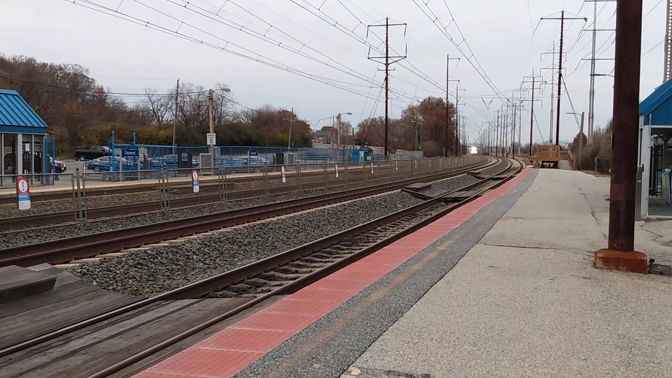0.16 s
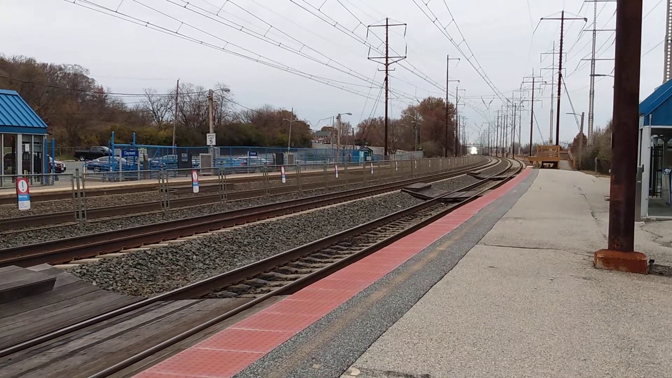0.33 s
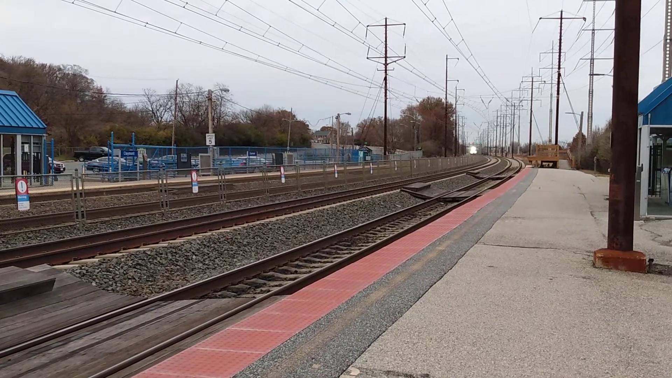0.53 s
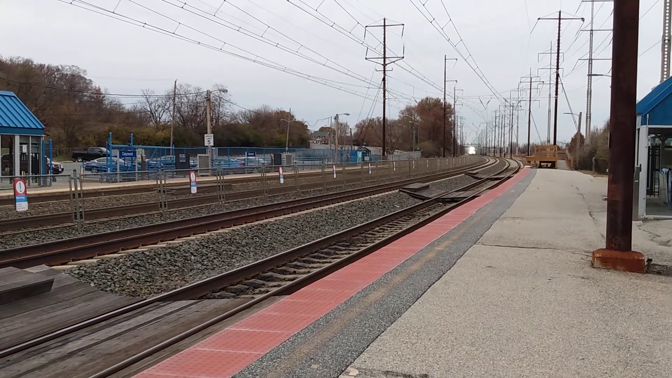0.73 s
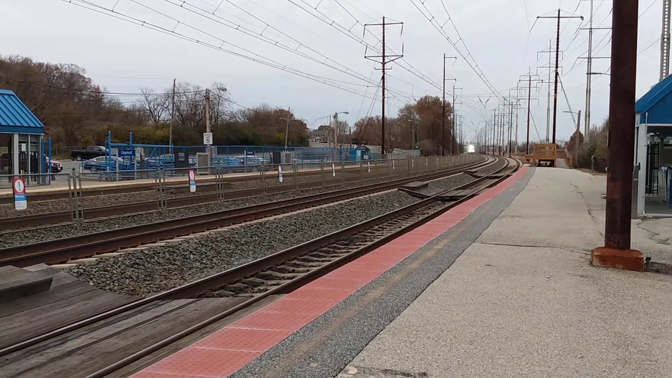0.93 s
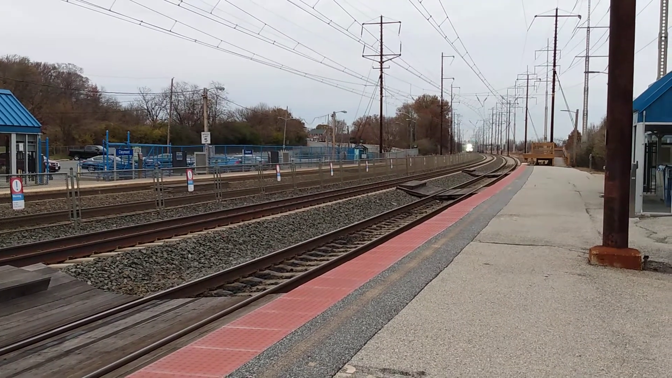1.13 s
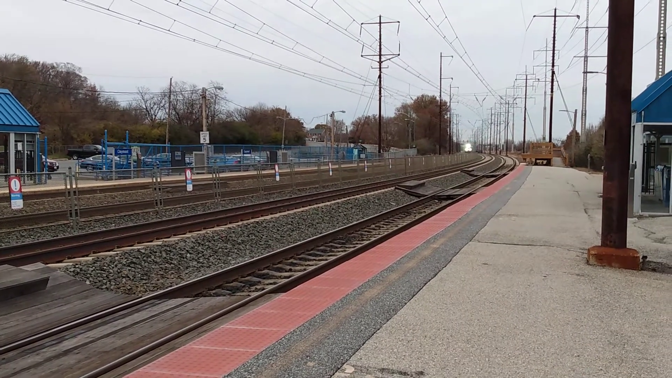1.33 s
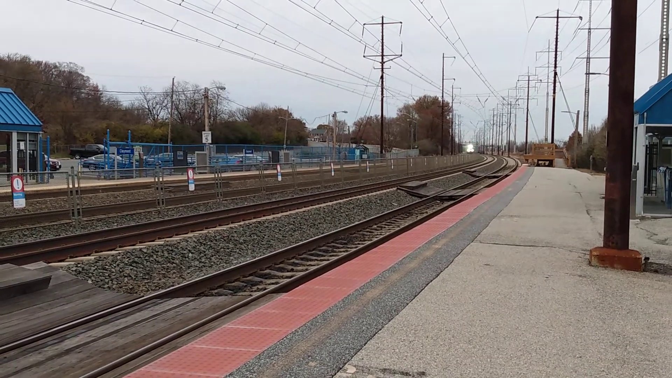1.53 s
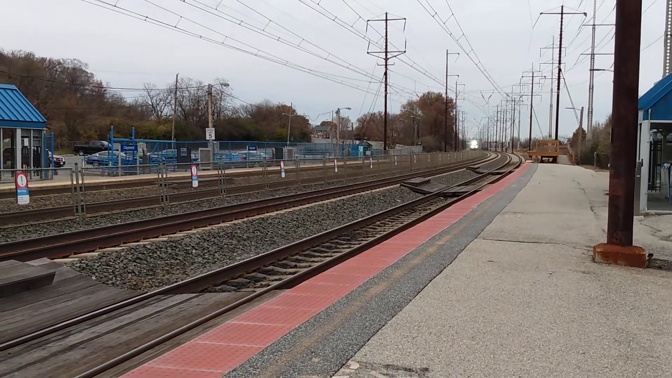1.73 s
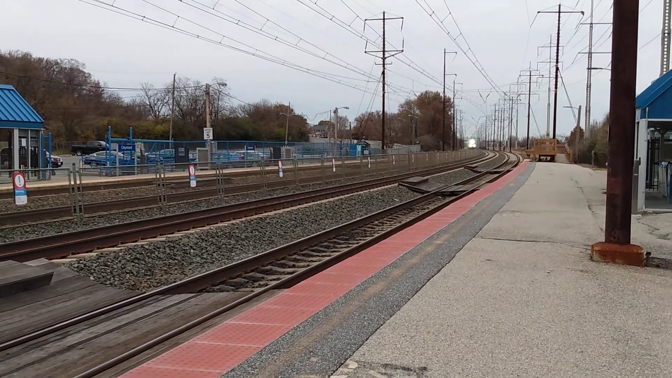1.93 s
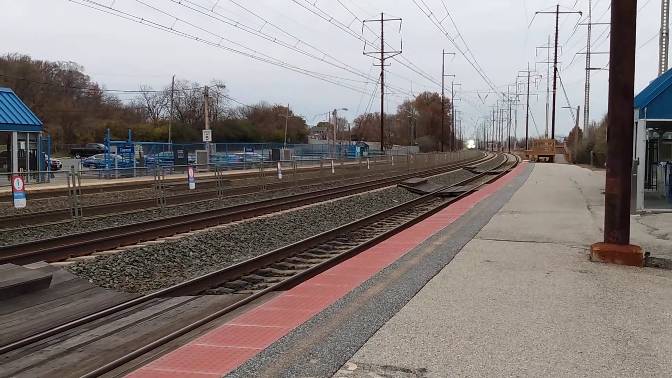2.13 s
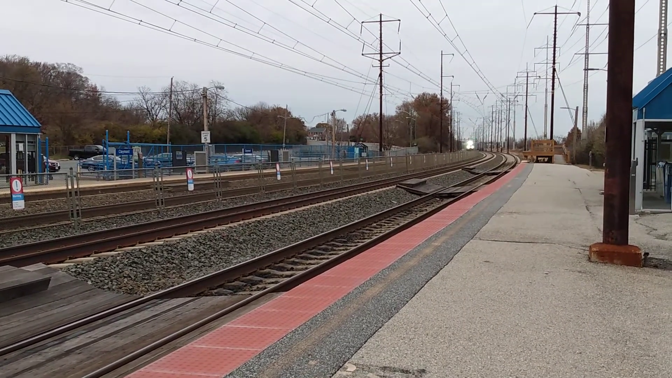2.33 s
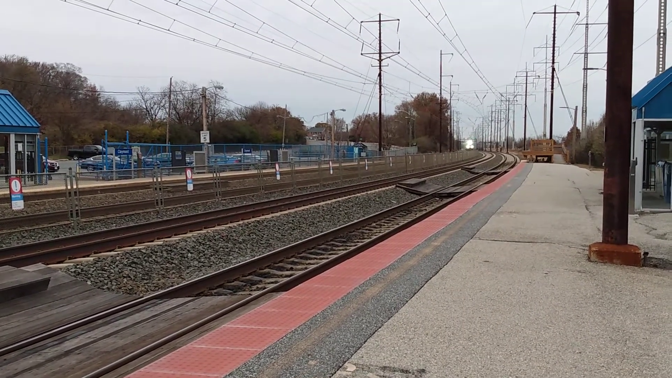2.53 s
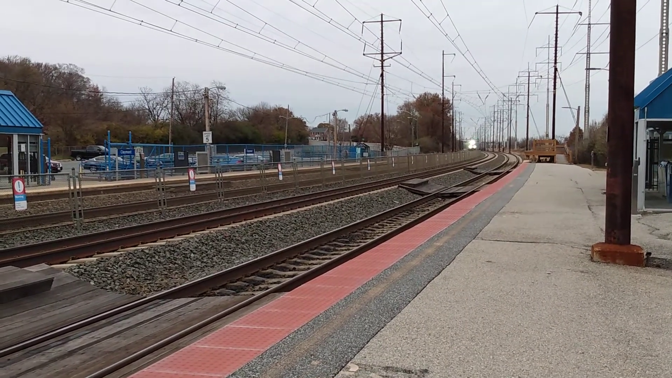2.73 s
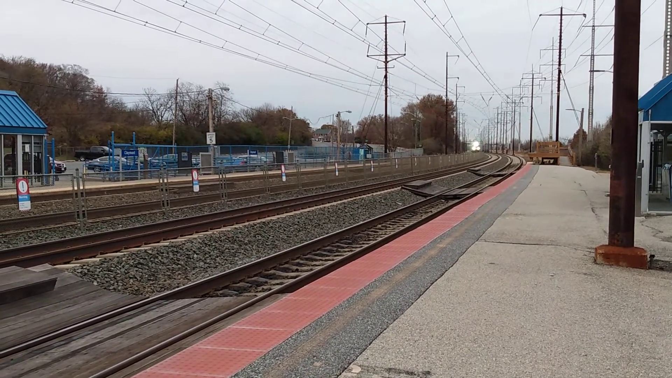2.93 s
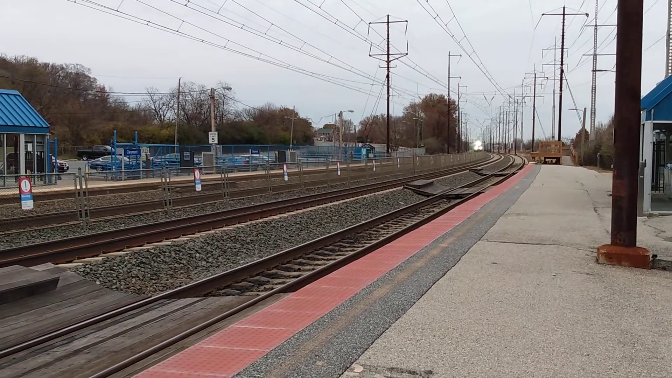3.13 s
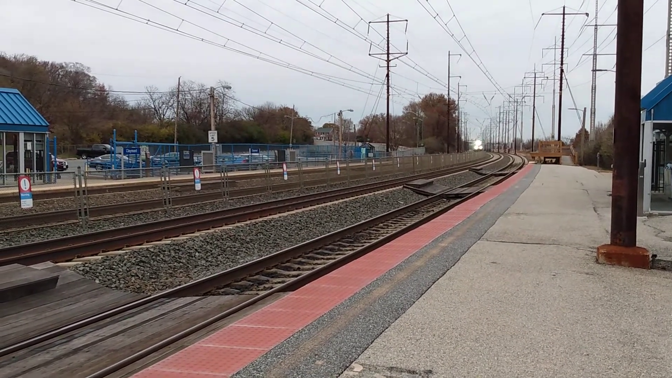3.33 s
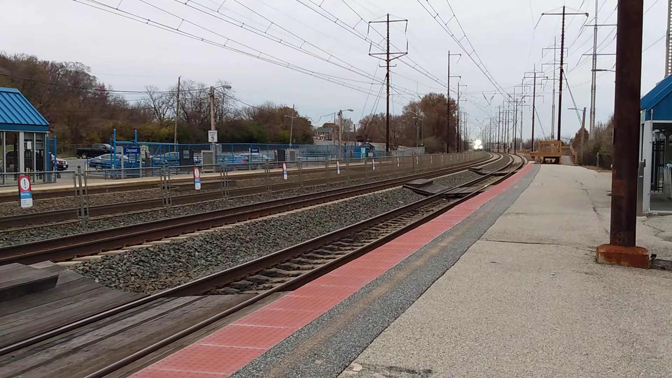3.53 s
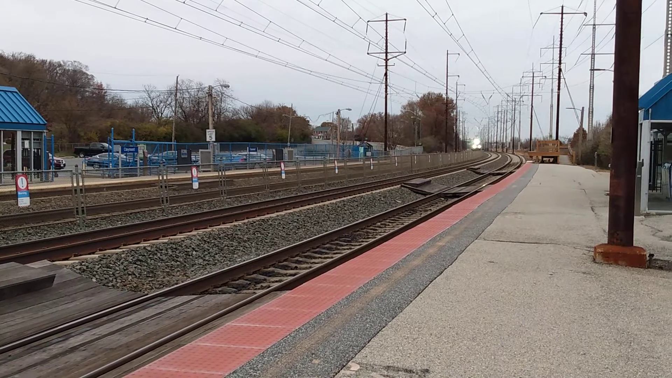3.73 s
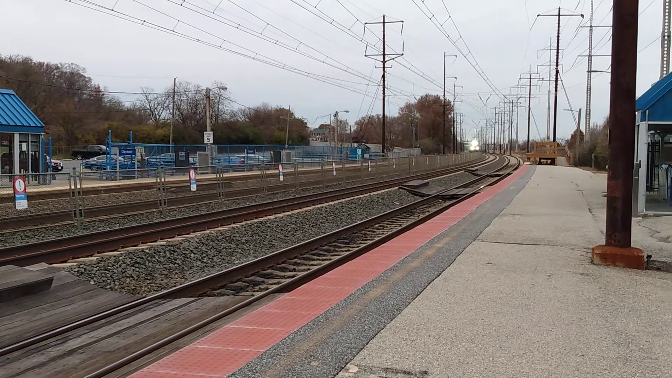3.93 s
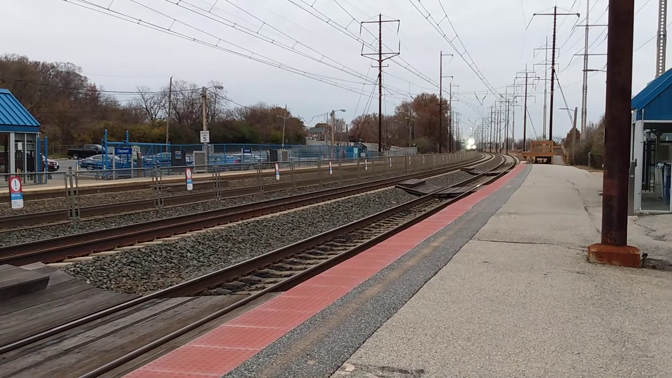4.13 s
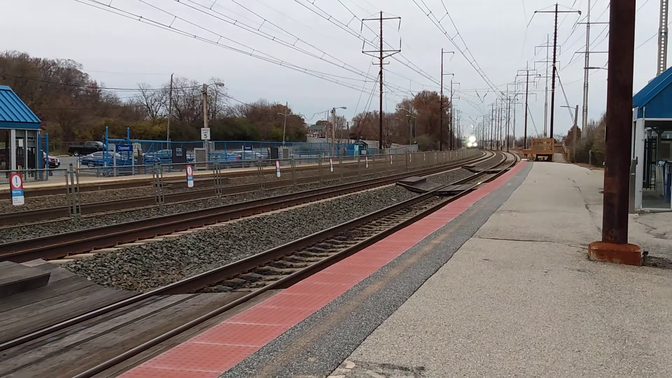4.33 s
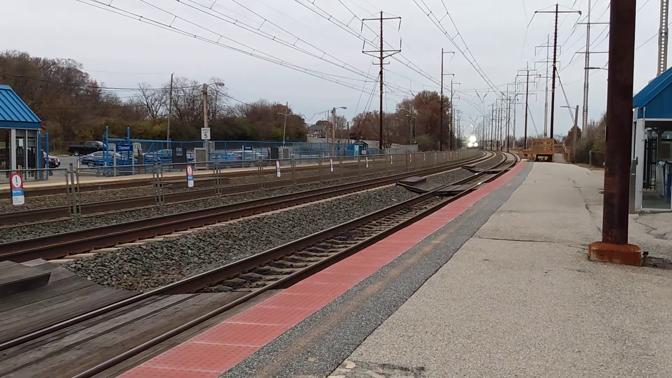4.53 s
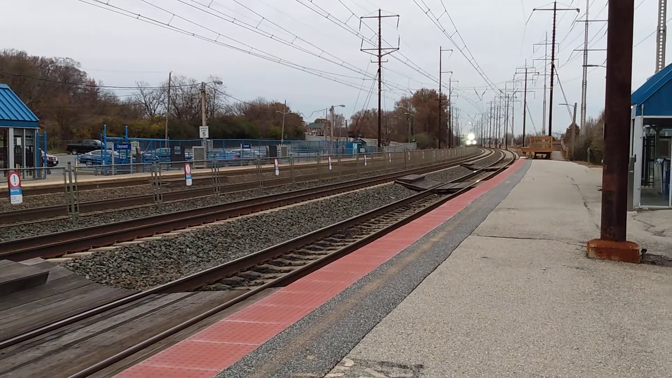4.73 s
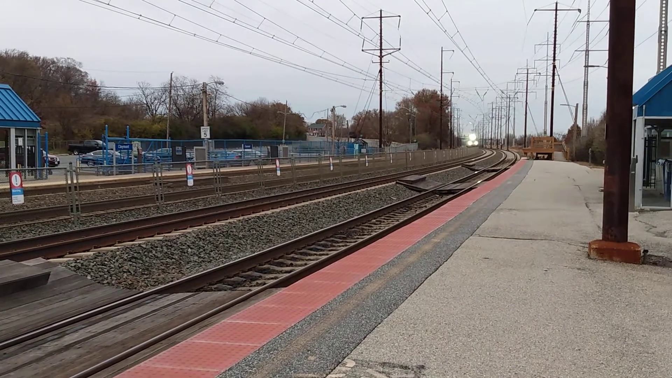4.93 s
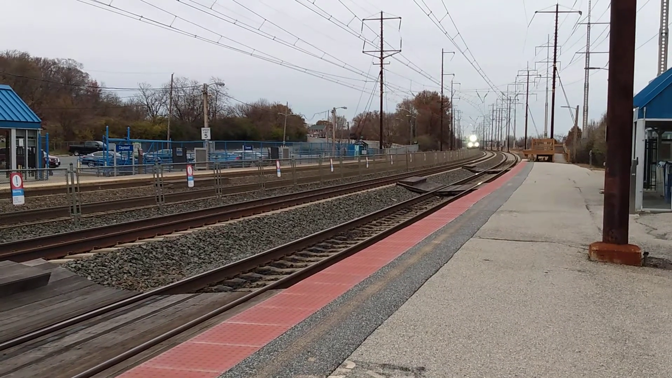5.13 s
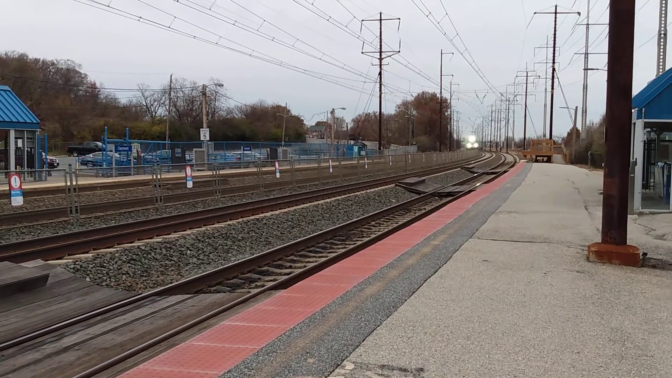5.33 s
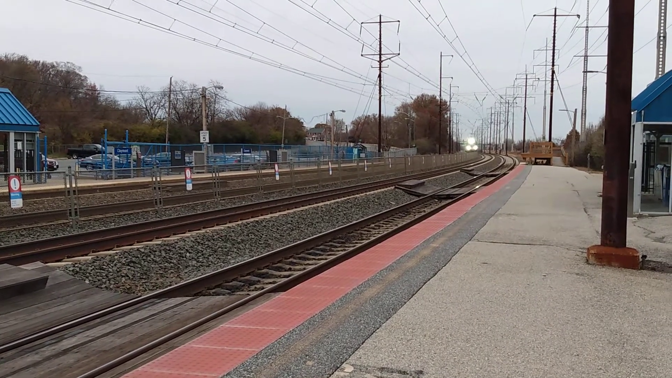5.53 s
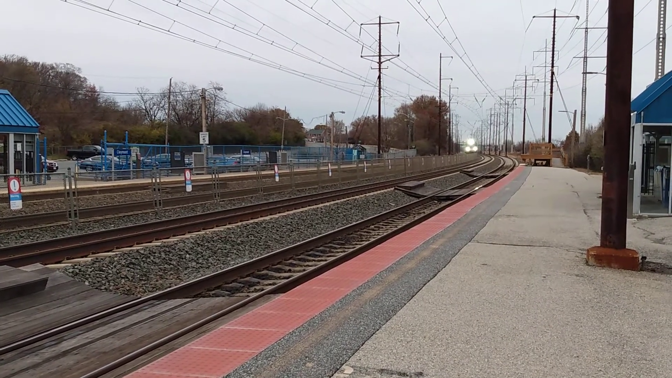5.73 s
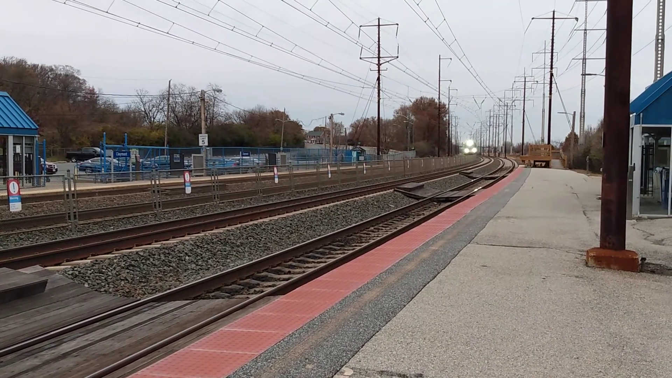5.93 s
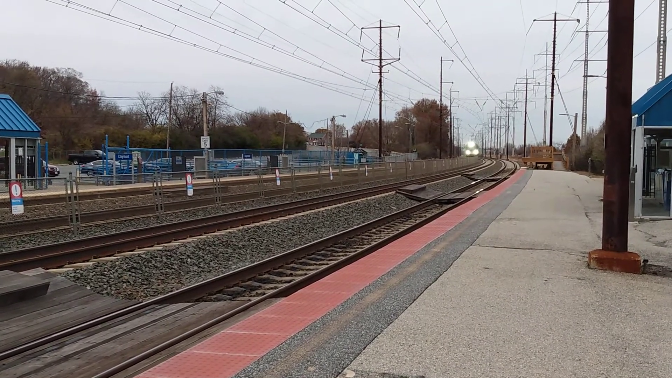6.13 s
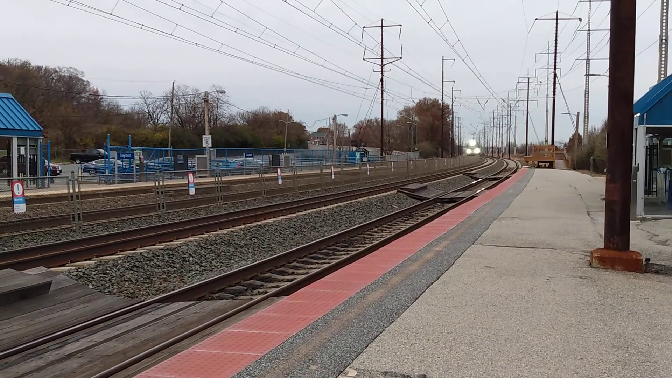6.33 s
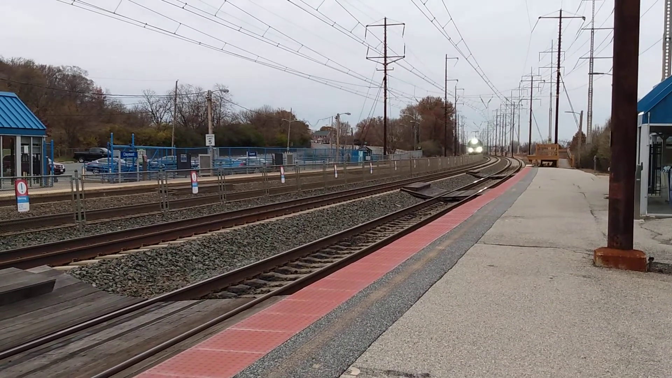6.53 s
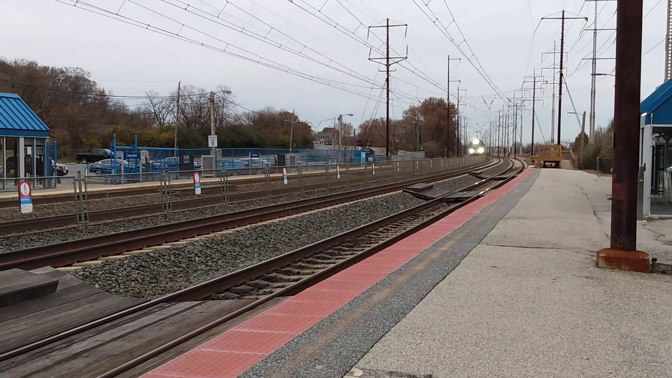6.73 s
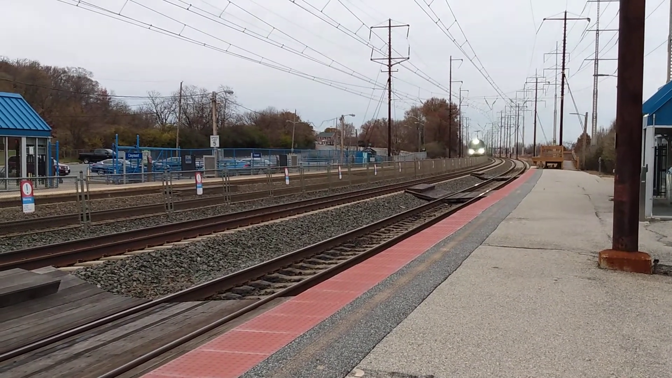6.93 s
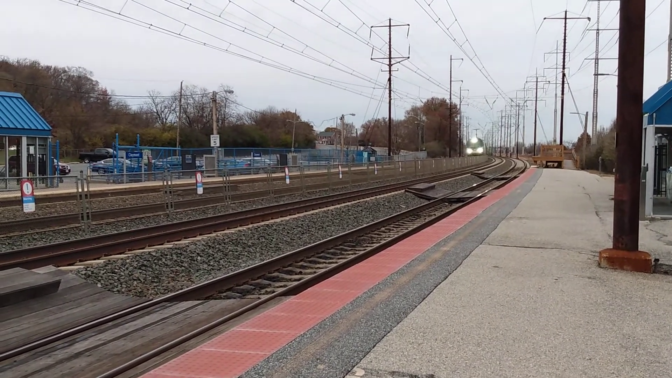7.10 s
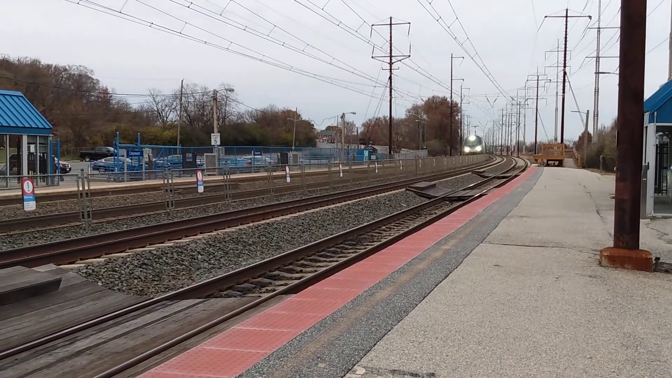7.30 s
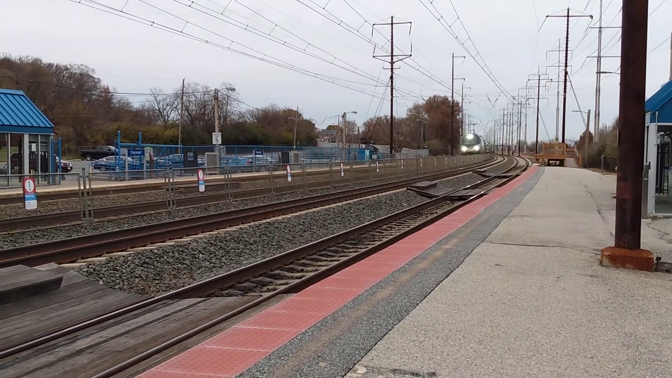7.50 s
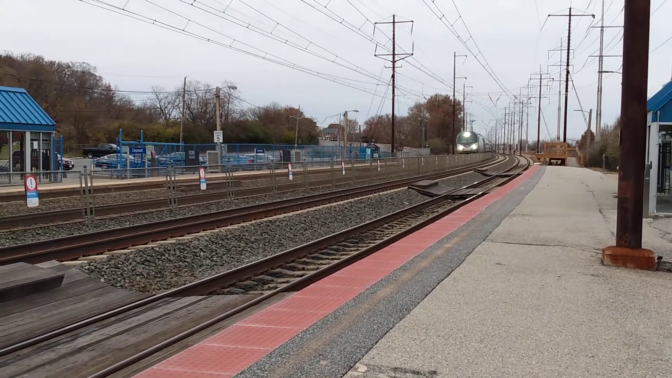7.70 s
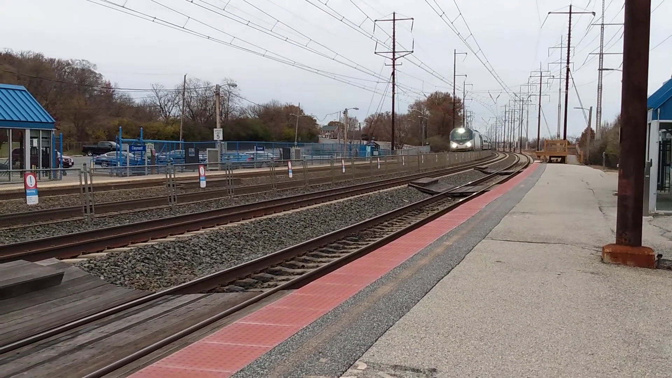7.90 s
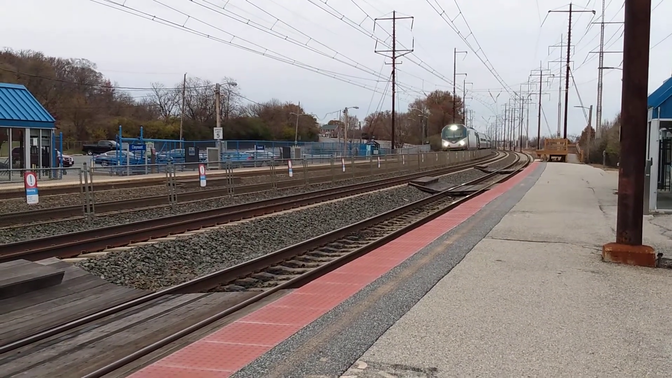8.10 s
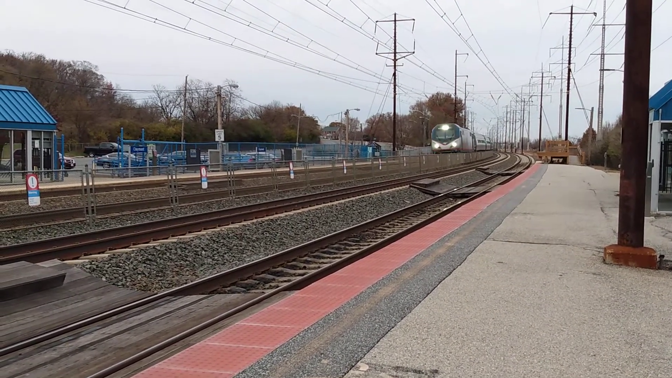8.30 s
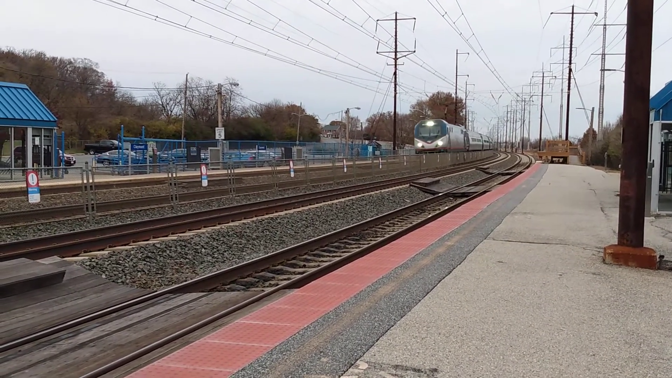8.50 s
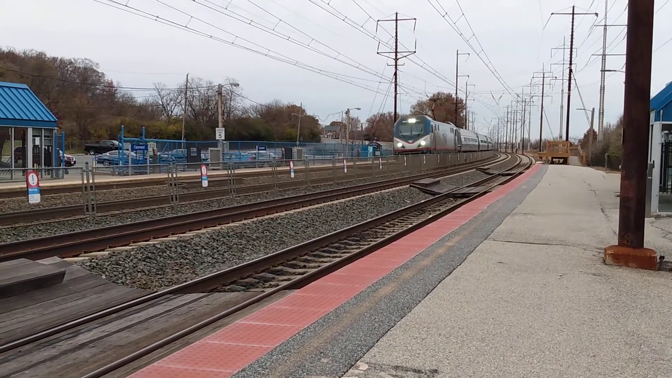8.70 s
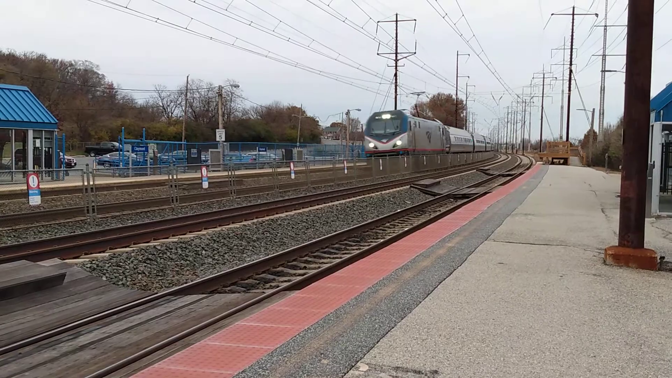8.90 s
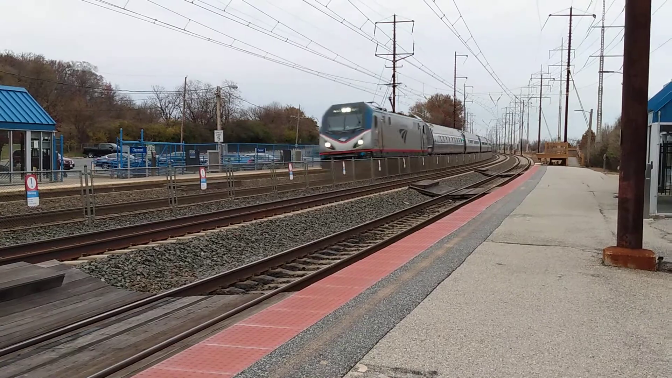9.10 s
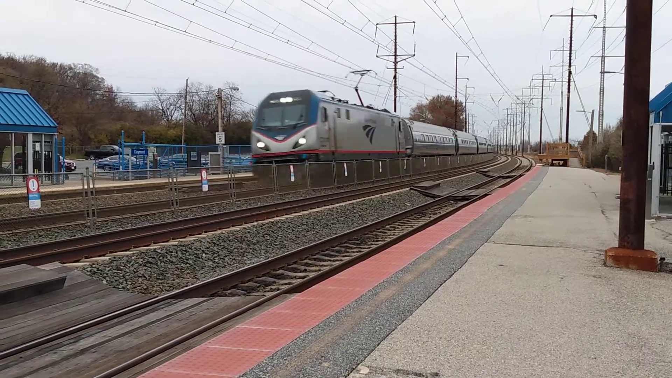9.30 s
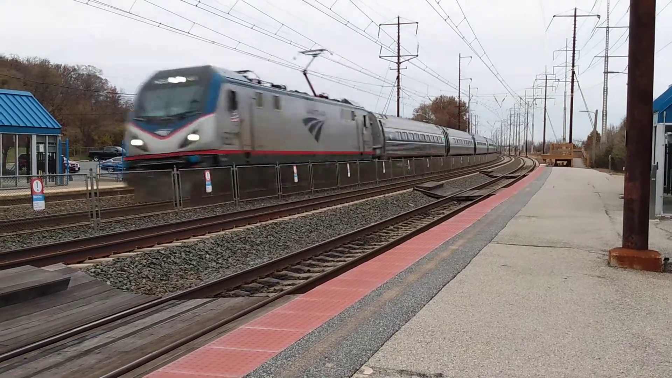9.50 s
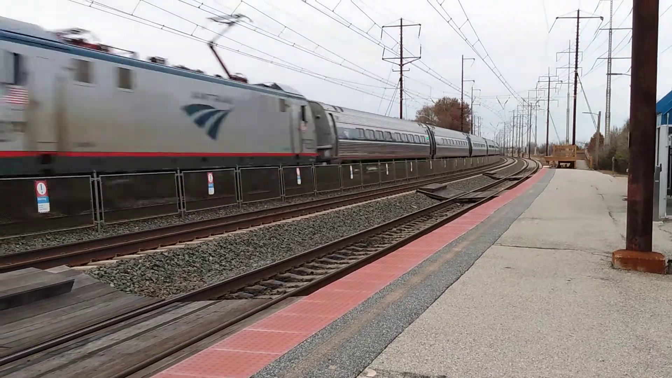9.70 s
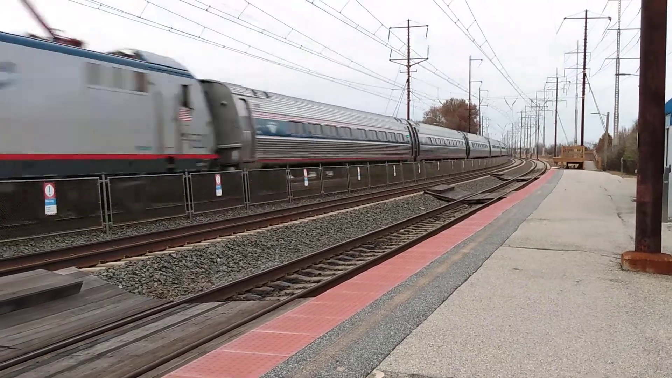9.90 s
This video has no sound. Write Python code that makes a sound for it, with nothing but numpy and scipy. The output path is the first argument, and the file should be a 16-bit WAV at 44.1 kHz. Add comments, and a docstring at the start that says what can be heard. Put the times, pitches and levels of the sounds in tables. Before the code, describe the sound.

A fast electric train nears an outdoor platform, the rails singing and hissing ahead of it before its wheels roar up alongside.

```python
"""An electric passenger train nears an open platform at speed and draws level at the very end.
Its car bodies rumble, rough treads roar and wheel discs hiss, swelling and swinging from ahead to the
side, with one crack on the points and a brief hum from the locomotive. Long before it arrives, waves
running ahead through the steel make the rails ring and sizzle. Behind it all lie a distant rush,
a low drone, dull blips and thuds, faint falling pings and twangs, and a few chips of a small bird."""
import sys
import numpy as np
from scipy import signal
from scipy.io import wavfile
from scipy.ndimage import map_coordinates

SR = 44100
rng = np.random.default_rng(int(sys.argv[2]) if len(sys.argv) > 2 else 0)


def put_to_file(sound):
    """Save the sound as 16-bit audio at rate SR, in the file named by the first command-line argument."""
    columns = np.atleast_2d(sound).T  # one column per channel
    safe = np.clip(columns, -1, 1)
    whole_steps = np.round(safe * 32767)
    wavfile.write(sys.argv[1], SR, whole_steps.astype(np.int16))


N = 438794
FRAME, HOP = 2048, 512
TIME = np.arange(N) / SR
FRAME_S = np.arange(N // HOP + 2) * HOP / SR
BIN_HZ = np.maximum(np.arange(FRAME // 2 + 1) * SR / FRAME, 1)[:, None]
SPEED_M_S, ALONGSIDE_S, TRACK_M = 50.4, 9.688, 21.84  # the pass: how fast, when, how far away
OPEN_M, BEND_M = 104, 13.5  # how far up the line the train rounds the bend, and over what stretch


def undb(db):
    """Decibels to gain."""
    return 10 ** (np.asarray(db) / 20)


def curve(table, t, column=1):
    """An automation line through one column of a table."""
    rows = np.array(table, float)
    return np.interp(t, rows[:, 0], rows[:, column])


def shape(points, hz=BIN_HZ):
    """An EQ curve: (freq_hz, value) points joined on a log-frequency axis."""
    rows = np.array(points, float)
    return np.interp(np.log(hz), np.log(rows[:, 0]), rows[:, 1])


def resonances(modes):
    """Bell curves in dB, from rows of centre_hz, width_hz, gain_db."""
    return sum(db / (1 + (2 * (BIN_HZ - hz) / width) ** 2) for hz, width, db in modes)


def swells(table, t=TIME, column=2):
    """Rounded rises and dips, from rows of middle_s, length_s, height."""
    return sum(row[column] / (1 + (2 * (t - row[0]) / row[1]) ** 4) for row in table)


def surges(table, column=2, attack_s=0.016, release_s=0.025):
    """Boosts in dB that set in quickly, hold and die away."""
    rise = lambda s: 1 - np.exp(-np.maximum(TIME - s, 0) / attack_s)
    fall = lambda s: np.exp(-np.maximum(TIME - s, 0) / release_s)
    return sum(row[column] * rise(row[0]) * fall(row[0] + row[1]) for row in table)


def bursts(table, attack_s=0.018):
    """Boosts in dB that flare at once and ebb smoothly over their length."""
    age = lambda s: np.maximum(TIME - s, 0)
    return sum(db * (1 - np.exp(-age(s) / attack_s)) * np.exp(-(age(s) / length_s) ** 2)
               for s, length_s, db in table)


def flicker(rate, decay_s):
    """Random flare-ups that start at once and die away; mean 0, spread 1."""
    kicks = (rng.random(N) < rate / SR) * rng.uniform(0.45, 1, N)
    glow = signal.lfilter([1], [1, -np.exp(-1 / (decay_s * SR))], kicks)
    return (glow - glow.mean()) / glow.std()


def wander(rate):
    """Random drift to a new value every 1 / rate s; spread near 1."""
    return 1.2 * np.interp(TIME * rate, np.arange(8192), rng.standard_normal(8192))


def eddies(rate, width_hz):
    """Moving air and ground reflections fade patches of the spectrum in and out."""
    where = np.broadcast_arrays(BIN_HZ / width_hz, FRAME_S * rate)
    return map_coordinates(rng.standard_normal((256, 256)), where, order=1, mode="mirror")


def noise(colour_db, balance_db, likeness, band, lag_ms=0.404, apart_hz=1100):
    """Stereo noise of moving colour, levelled within a band; above apart_hz the right side lags."""
    white = rng.standard_normal((2, len(BIN_HZ), 2 * len(FRAME_S)), dtype=np.float32).view(np.complex64)
    alike = np.clip(likeness, 0, .999)
    delay = np.exp(-2j * np.pi * BIN_HZ * lag_ms / 1000 / (1 + (apart_hz / BIN_HZ) ** 6))
    ratio = undb(balance_db)
    right = undb(colour_db) / np.sqrt(1 + ratio ** 2)
    left = right * ratio
    inside = (BIN_HZ > band[0]) & (BIN_HZ < band[1])
    power = np.sum(inside * (left ** 2 + right ** 2 + 2 * left * right * alike * delay.real), axis=0) / 4
    blend = alike * white[0] + np.sqrt(1 - alike ** 2) * white[1]
    pair = np.array([left * white[0], right * delay * blend]) / np.sqrt(power)
    sound = signal.istft(pair.astype(np.complex64), nperseg=FRAME, noverlap=FRAME - HOP)[1]
    return sound[:, :N] * np.sqrt(3 / 2)


def phase_of(hz):
    """Running phase of a moving pitch."""
    return 2 * np.pi * np.cumsum(hz) / SR


def place(track, start_s, sound):
    """Mixes a sound into a track at its cue."""
    start = int(start_s * SR)
    track[..., start:start + sound.shape[-1]] += sound


def soft_hit(t, rise_s):
    """An envelope that rounds up to 1 at rise_s, then fades."""
    return (t / rise_s * np.exp(1 - t / rise_s)) ** 2


def zips(table, rise_s, fall_octaves_per_s, rough):
    """Short, rough tones that slide down as they fade."""
    out = np.zeros(N + SR)
    t = TIME[:SR // 5]
    for start_s, db, hz in table:
        jitter = np.interp(t * 200, np.arange(48), rng.standard_normal(48))
        pitch = hz * 2 ** (-fall_octaves_per_s * (t - rise_s)) * (1 + rough * jitter)
        place(out, start_s, undb(db) * soft_hit(t, rise_s) * np.sin(phase_of(pitch)))
    return out[:N]


def ahead_m(t):
    """Track left before the train arrives; it stays at 0 as the cars keep coming."""
    return np.maximum(SPEED_M_S * (ALONGSIDE_S - t), 0)


def within(metres, t):
    """Fades from 0 to 1 as the train passes a point that far up the line."""
    return .5 + .5 * np.tanh((metres - ahead_m(t)) / (2 * BEND_M))


def closeness():
    """Sine of the angle between track and line of sight: small far ahead, 1 alongside."""
    return TRACK_M / np.hypot(ahead_m(FRAME_S), TRACK_M)


def swing(ahead, beside, in_open=0.68, alongside=.92):
    """Morphs between two EQ curves as the train leaves the bend and comes round to the side."""
    share = within(OPEN_M, FRAME_S) * (in_open + (alongside - in_open) * closeness())
    return (1 - share) * shape(ahead) + share * shape(beside)


def through_air(alongside_db, loss_db_per_m, earshot_m):
    """Gain that falls as 1 / distance, loses more to ground and air, and is screened by the bend."""
    range_m = np.hypot(ahead_m(TIME), TRACK_M)
    level_db = alongside_db - loss_db_per_m * (range_m - TRACK_M)
    return undb(level_db) * TRACK_M / range_m * within(earshot_m, TIME)


def faint_hiss(middle_s=0.97, length_s=0.75, level_db=-79):
    """A faint high hiss swells once and is gone."""
    colour = shape([(6000, -25), (8500, 1), (10600, 1), (12000, -14)])
    return noise(colour, 0, .3, band=(8000, 11500)) * swells([(middle_s, length_s, undb(level_db))])


# tone of the drone: freq_hz, gain_db
DRONE_EQ = [(20, -28), (40, -3), (65, 3.5), (88, 0.5), (130, -6.5), (200, -7.5), (270, -14), (350, -17.5),
            (480, -31), (900, -60)]
# its swells: middle_s, length_s, boost_db
DRONE_SWELLS = [(1.1, 0.72, 5), (4.8, 0.054, 7), (5.0, 0.059, 5), (5.68, .2, 4.5), (6.05, 0.091, 4),
                (6.5, 0.27, 6)]


def drone(rest_db=-65):
    """A low outdoor bed that swells now and then, almost mono."""
    colour = shape(DRONE_EQ) + 3.9 * eddies(rate=5.7, width_hz=68)
    bed = noise(colour, -0.57, shape([(100, 0.97), (280, 1)]), band=(40, 300))
    return bed * undb(rest_db + swells(DRONE_SWELLS) + wander(9))


# tone of the murmur: freq_hz, gain_db
MURMUR_EQ = [(200, -30), (380, -30), (460, -40), (600, -13), (800, 1), (1020, 2), (1130, -5), (1260, -9.5),
             (1900, -71), (2350, -5), (2700, -28), (3200, -46)]
# its swells and lulls: middle_s, length_s, boost_db, shift_hz
MURMUR_SWELLS = [(.58, 0.11, 3.5, -90), (.88, 0.11, 7.5, -70), (2.08, 0.76, 5.5, -73), (2.5, 0.2, -6, -110),
                 (3.2, 0.16, 3, -130), (3.79, 0.15, 4.5, -160), (3.94, .1, 3.5, -20), (4.07, .13, 0, 150),
                 (4.26, 0.12, -6, 0), (4.38, .08, 1, -110), (5.09, .17, 2.5, -110), (5.4, .16, -3.5, 0),
                 (5.62, 0.15, 8, 130), (5.78, .12, 5, 70), (5.88, .08, 3, -90), (6.1, 0.11, -3, 60),
                 (6.7, 0.16, 6, -20), (7.2, 0.093, 9, -60)]


def murmur(rest_db=-57.5, centre_hz=977, skirt_follows=0.4):
    """The lower band of the distant rush, to the left, fluttering in the air as its centre shifts."""
    shift_hz = swells(MURMUR_SWELLS, FRAME_S, column=3)
    focus = resonances([(centre_hz + shift_hz, 150, 7), (1005, 60, 6.5)])
    skirt = shape(MURMUR_EQ, BIN_HZ * centre_hz / (centre_hz + skirt_follows * shift_hz))
    flutter = shape([(800, 8), (1000, 5.4)]) * eddies(rate=22, width_hz=84.6)
    bed = noise(skirt + focus + flutter, 18, 0.37, band=(650, 1150), apart_hz=870)
    return bed * undb(rest_db + swells(MURMUR_SWELLS) + 1.5 * wander(18))


# tone of the rush: freq_hz, gain_db
RUSH_EQ = [(350, -37), (650, -24.5), (1000, -23), (1400, -42), (1600, -3), (1790, 0.5), (2200, -6),
           (2900, -16.5), (3500, -18), (4700, -21), (5600, -32), (7000, -52), (8500, -74)]
# its fader and brightness moves: time_s, level_db, treble_db
RUSH_FADER = [(0, -48.5, -3), (2.27, -48.5, -2), (2.7, -51, -5.5), (3.4, -49.5, -8.5), (4.6, -50, -24.5),
              (5.6, -46.5, -22), (6.3, -47, -24.5), (6.9, -45.5, -12.5)]


def rush():
    """The upper band of the distant rush, to the right, fluttering in the air as its treble drifts."""
    treble_db = curve(RUSH_FADER, FRAME_S, column=2)
    depth = shape([(2200, 0.5), (3000, 0.59), (5000, 0.91), (6000, 1.5), (7000, 2.55)])
    flutter = shape([(1450, 4.4), (1800, 1.4)]) * eddies(rate=14, width_hz=137.8)
    colour = shape(RUSH_EQ) + (treble_db - treble_db.mean()) * depth + flutter
    balance = shape([(900, -0.5), (1800, -30), (3000, -16.5), (4500, -23.5), (7000, -5.5)])
    bed = noise(colour, balance, 0.37, band=(1650, 2600))
    return bed * undb(curve(RUSH_FADER, TIME) + 0.65 * wander(11))


# weight of the blips by pitch: pitch_hz, gain_db
MUTTER_EQ = [(140, -11), (250, -4), (330, -2), (420, -4), (560, 1.5), (750, -3)]
# fader of the mutter: time_s, level_db
MUTTER_FADER = [(0, -60.5), (1.1, -67.5), (1.9, -68), (2.3, -72), (3, -75), (5.6, -78), (6.05, -70),
                (6.9, -66.5), (7.35, -61), (8.2, -47), (9.95, -56)]


def mutter(count=900, length_s=0.078, spread_db=3.5, glide=-0.17, width=0.52):
    """Soft, dull blips of random pitch; now and then one stands out."""
    out = np.zeros((2, N + SR))
    progress = np.linspace(0, 1, int(length_s * SR))
    envelope = np.sin(np.pi * progress) ** 2
    for when, pitch, size, side, bend in rng.random((count, 5)):
        hz = 150 + 600 * pitch
        db = shape(MUTTER_EQ, hz) - spread_db * np.log(0.016 + size)
        phase = phase_of(hz * (1 + 2 * glide * bend * (progress - .5)))
        skew = width * hz / 200 * (2 * side - 1) * np.array([[1], [-1]])  # higher blips spread wider
        place(out, when * N / SR, undb(db) * envelope * np.sin(phase + skew))
    return out[:, :N] / out[:, :N].std() * undb(curve(MUTTER_FADER, TIME))


# thud cues, before the trim: start_s, level_db, pitch_hz
THUDS = [(0.348, -53.0, 385), (1.37, -59.0, 410), (1.549, -61.0, 310), (1.832, -58, 260),
         (1.902, -55.5, 170), (2.281, -56, 180), (2.618, -57.0, 275), (6.065, -56.5, 254),
         (6.381, -55, 116), (6.561, -57, 210), (6.619, -52.5, 175), (7.274, -45, 275), (7.323, -49, 230),
         (7.453, -44, 314), (7.51, -42, 327), (7.715, -42, 300), (7.77, -46, 260), (7.85, -40, 310),
         (7.915, -38, 312), (8.175, -32, 180), (8.24, -33, 170), (8.405, -34, 290), (8.485, -33, 183),
         (8.96, -27, 290)]


def thuds(trim_db=-2):
    """Dull thuds from far off, dead centre."""
    return zips(THUDS, rise_s=0.018, fall_octaves_per_s=2.5, rough=0.074) * undb(trim_db)


# dry bird chips: start_s, level_db, top_pitch_hz, length_s
CHIPS = [(1.813, -55, 7300, 0.036), (2.796, -69, 7200, 0.21), (4.845, -56.5, 6930, 0.041),
         (6.471, -58.5, 7100, 0.044)]


def bird(rise_s=.007, start_hz=5700, warble_hz=520, tail_s=0.054, echo_db=-1.5, left_db=-5):
    """Each chip flicks up in pitch and holds; poles and shelters throw back a short train of echoes."""
    chips = np.zeros(N)
    for start_s, db, top_hz, length_s in CHIPS:
        t = np.arange(int(length_s * SR)) / SR
        warble = warble_hz * np.sin(2 * np.pi * 170 * t)
        pitch = top_hz - (top_hz - start_hz) * np.exp(-t / rise_s) + warble
        place(chips, start_s, undb(db) * np.sin(np.pi * t / length_s) * np.sin(phase_of(pitch)))
    size = SR // 5
    taps = (rng.random((2, size)) < 56 / size) * np.exp(-TIME[:size] / tail_s)  # about 56 a side
    taps /= np.linalg.norm(taps, axis=1, keepdims=True)
    echo = signal.fftconvolve(chips[None], taps, axes=1)[:, :N]
    return (chips + undb(echo_db) * echo) * undb([[left_db], [0]])


# ping cues, before the trim: start_s, level_db, pitch_hz
PINGS = [(0.216, -47, 755), (0.287, -47.0, 742), (0.532, -42.0, 844), (0.672, -44, 980), (0.85, -39, 855),
         (0.855, -40, 935), (1.46, -47.0, 855), (1.601, -44, 823), (1.86, -44, 1000), (1.997, -41, 835),
         (2.082, -38, 894), (2.173, -43.0, 930), (2.6, -51.0, 726), (3.115, -43.0, 820), (3.237, -49, 760),
         (3.787, -44.5, 815), (3.829, -48, 880), (3.94, -41.5, 970), (4.348, -47, 913), (4.747, -42, 1028),
         (5.017, -45, 945), (5.073, -46.0, 860), (5.105, -43, 855), (5.537, -40, 996), (5.6, -42, 1130),
         (5.631, -49, 777), (5.848, -43.0, 910), (6.655, -41, 990), (6.642, -46, 667), (7.173, -39, 952)]


def pings(trim_db=-4, right_db=-15):
    """Short, faint pings around 900 Hz, each sliding down, off to the left."""
    tones = zips(PINGS, rise_s=0.0187, fall_octaves_per_s=2.7, rough=0.045)
    return tones * np.sqrt(2) * undb(trim_db) * undb([[0], [right_db]])


# twang cues: start_s, level_db
TWANGS = [(3.56, -53), (4.115, -44.5), (5.13, -51), (5.78, -48), (6.2, -47)]


def twangs(start_hz=1300, end_hz=560, fall_s=0.028, rise_s=0.022, rough=0.08, right_db=-14):
    """Short, rough swoops from high to low, off to the left."""
    out = np.zeros(N + SR)
    t = TIME[:SR // 5]
    swoop_hz = end_hz + (start_hz - end_hz) * np.exp(-t / fall_s)
    for start_s, db in TWANGS:
        pitch = swoop_hz * (1 + rough * wander(300)[:len(t)])
        place(out, start_s, undb(db) * soft_hit(t, rise_s) * np.sin(phase_of(pitch)))
    return out[:N] * undb([[0], [right_db]])


# panning with the train ahead, then beside: freq_hz, left_minus_right_db
PAN_AHEAD = [(300, 3.5), (620, 7), (800, 23.5), (1000, 49), (1250, 27), (1450, -13), (1950, -7), (2400, 7),
             (2800, -2), (3350, -11), (5000, -8), (7500, -2), (10000, 10), (12500, -2)]
PAN_BESIDE = [(300, -1), (520, -2.5), (800, -4.5), (1000, -6), (1250, -14), (1500, -5), (2050, -5),
              (2550, 4), (3100, 1.5), (3700, -6.5), (4700, -12.5), (7500, 1), (10000, 5), (12500, -2)]
# how alike the two channels are: freq_hz, likeness_0_to_1
LIKENESS = [(100, 0.99), (300, 0.99), (500, 0.84), (900, 0.77), (1200, 0.8), (1480, 0.66), (1950, 0.27),
            (2700, 0.3), (6000, 0), (14000, 0.15)]


def stereo_image():
    """Balance and likeness for train and rails; the balance follows the train round."""
    return swing(PAN_AHEAD, PAN_BESIDE), shape(LIKENESS)


# sharp tones within the ring: pitch_hz, width_hz, gain_ahead_db, gain_beside_db
RAIL_TONES = [(1410, 18, -4, -20), (1453, 12, -6, -4), (1540, 34, -17, -3.5)]


def rail_singing(left_db=-5, lag_ms=0.37, alike=0.8):
    """The rail's sharpest resonances waver; the higher ones take over as the wheels draw level."""
    near = np.interp(TIME, FRAME_S, closeness())
    out = 0
    for hz, width_hz, ahead_db, beside_db in RAIL_TONES:
        right, own = (wander(2 * width_hz) + 1j * wander(2 * width_hz) for _ in range(2))
        left = (alike * right + np.sqrt(1 - alike ** 2) * own) * np.exp(2j * np.pi * hz * lag_ms / 1000)
        tone = (np.array([left, right]) * np.exp(2j * np.pi * hz * TIME)).real
        out += tone * undb(ahead_db + (beside_db - ahead_db) * near)
    return 2 * out * undb([[left_db], [0]])


# tone of the ring when centred on 1440 Hz: freq_hz, gain_db
RING_EQ = [(900, -40), (1200, -12), (1330, -2), (1395, 1.5), (1440, 6), (1490, 1.5), (1560, -2), (1750, -9),
           (2100, -19), (3000, -64)]
# drift of its centre: time_s, pitch_hz
RING_PITCH = [(0, 1500), (2, 1320), (2.6, 1500), (5, 1490), (5.6, 1410), (6.1, 1485), (6.6, 1490),
              (7.4, 1430), (8.6, 1425), (9.2, 1490), (9.95, 1540)]
# its flares: start_s, length_s, boost_db
RING_FLARES = [(1.94, 0.097, 20), (2.3, 0.11, 11), (2.93, 0.1, 11), (4.92, .07, 7), (5.21, 0.046, 5),
               (5.42, 0.086, 7), (5.94, 0.061, 5), (6.7, .1, 3), (7.11, 0.052, 3.5), (7.68, .16, 3),
               (8.2, .12, 2.5), (9.7, .16, 3)]


def rail_ring(remote, rest_db=-72.5, at_wheels_db=-32.3, loss_db_per_m=0.12, reach_m=232):
    """The rails ring at their bending resonance, heard through steel and air, unsteady from afar."""
    balance, alike = stereo_image()
    colour = shape(RING_EQ, BIN_HZ * 1440 / curve(RING_PITCH, FRAME_S)) + 3 * eddies(rate=7, width_hz=28)
    ring = noise(colour, np.minimum(balance, -5), alike, band=(1250, 1560), lag_ms=0.37) + rail_singing()
    carried = undb(at_wheels_db - loss_db_per_m * ahead_m(TIME)) * within(reach_m, TIME)
    airborne = through_air(alongside_db=-26.5, loss_db_per_m=0.135, earshot_m=160)
    gain = np.sqrt(undb(rest_db) ** 2 + carried ** 2 + airborne ** 2)
    waver_db = 4 * np.interp(TIME, FRAME_S, remote) * wander(14)
    return ring * gain * undb(surges(RING_FLARES) + waver_db)


# tone of the sizzle: freq_hz, gain_db
SIZZLE_EQ = [(7000, -45), (9000, -18.5), (9600, -14), (11200, -7), (12100, -.5), (12650, 1), (13550, -2.5),
             (14400, 1.5), (15200, -3.5), (16000, -6)]
# narrow bright peaks that colour the sizzle: centre_hz, width_hz, gain_db
SIZZLE_PEAKS = [(9800, 200, 6), (12110, 120, 3), (12400, 200, 2.5), (12930, 130, 3), (14260, 260, 3.5),
                (14730, 110, 4)]
# its fader: time_s, level_db
SIZZLE_FADER = [(0, -76), (1.95, -73), (3.15, -70), (3.9, -64), (5.12, -62.5), (6, -56), (6.55, -53.5),
                (6.87, -46), (7.55, -42.5), (7.9, -34), (8.5, -33.5), (9.15, -30.5), (9.58, -30.5),
                (9.95, -40.5)]
# its bursts: start_s, length_s, boost_db
SIZZLE_BURSTS = [(0, .1, 7), (.31, .15, 9), (.6, .13, 7), (.85, .19, 10), (1.11, .12, 6), (1.2, .17, 10),
                 (2.03, .15, 6), (2.21, .15, 6), (2.33, .3, 7.5), (2.65, .27, 7), (3.24, .17, 14),
                 (3.39, .15, 11), (3.55, .14, 9), (3.73, .09, 4), (3.9, .3, 7), (4.2, .24, 5),
                 (4.67, .2, 13), (4.92, .07, 4), (5.18, .12, 6), (5.37, .16, 9), (5.55, .12, 7),
                 (6.07, .2, 10), (6.22, .08, 3), (7.09, .07, 4), (7.605, .15, 8), (7.91, .22, 4.5),
                 (8.28, .05, 5)]


def rail_sizzle(remote, fine_modes_db=3.1):
    """High waves run far ahead of the wheels in the rail head as a flickering sizzle."""
    # from far off only the least damped waves, above 12 kHz, get through
    far_tilt = remote * shape([(11000, -39), (12200, 6.5), (15000, 15)])
    # many close, narrow modes, which blur as the wheels come near
    fine_modes = fine_modes_db * (1 - closeness()) * rng.standard_normal(BIN_HZ.shape)
    colour = shape(SIZZLE_EQ) + resonances(SIZZLE_PEAKS) + far_tilt + fine_modes
    colour += 0.5 * eddies(rate=9.6, width_hz=390)
    sizzle = noise(colour, *stereo_image(), band=(11800, 15500), lag_ms=0.414)
    depth_db = 1.4 + .7 * np.interp(TIME, FRAME_S, remote)
    flicker_db = depth_db * flicker(rate=24, decay_s=0.035) + 0.94 * wander(400)
    return sizzle * undb(curve(SIZZLE_FADER, TIME) + bursts(SIZZLE_BURSTS) + flicker_db)


# knock cue, before filter and trim: start_s, level_db
KNOCKS = [(7.876, -16.5)]


def wheel_knock(band_hz=(1800, 5300), decay_s=.01, trim_db=-10, left_db=-5):
    """A wheel strikes a gap in the points: a short, bright crack."""
    out = np.zeros((2, N))
    t = TIME[:SR // 10]
    band_pass = signal.butter(2, band_hz, "band", fs=SR, output="sos")
    for start_s, db in KNOCKS:
        crack = signal.sosfilt(band_pass, rng.standard_normal((2, len(t)))) * np.exp(-t / decay_s)
        place(out, start_s, undb(db + trim_db) * crack)
    return out * undb([[left_db], [0]])


# blower and drive tones at their closest: pitch_hz, level_db
LOCOMOTIVE_TONES = [(177.6, -20.5), (385, -32)]


def locomotive(closest_s=9.645, pass_s=0.075, waver=0.01):
    """The hum of blowers and drive swells and fades in a moment as the locomotive's flank sweeps by."""
    hum = 0
    for hz, db in LOCOMOTIVE_TONES:
        phase = phase_of(hz * (1 + waver * wander(25)))
        hum += np.sqrt(2) * np.sin(phase) * undb(db + wander(18))
    return hum / (1 + ((TIME - closest_s) / pass_s) ** 2)


# wheel resonances: centre_hz, width_hz, gain_db
WHEEL_MODES = [(696, 50, 6.5), (852, 24, 2), (948, 20, 3.5), (1160, 29, 4), (1610, 30, 4), (1710, 70, 3.5),
               (3010, 130, 7), (4550, 130, 2.5), (4740, 70, 4)]


def wheel_colour():
    """The wheels' resonances, in dB, come through at close range."""
    return resonances(WHEEL_MODES) * closeness()


# bogie accents: start_s, length_s, rumble_boost_db, roar_boost_db, hiss_boost_db
BOGIES = [(8.17, 0.16, 2.7, 0.5, 0), (9.35, .12, 2.5, 3, 0.53), (9.59, .08, 3.5, 0, 2),
          (9.69, .17, 1.5, 1.8, 1.8)]


def bogie_surges(layer):
    """Bogies running by push up one layer of the train, in dB."""
    return surges(BOGIES, column={"rumble": 2, "roar": 3, "hiss": 4}[layer])


# tone of the hiss from ahead, then beside: freq_hz, gain_db
HISS_EQ_AHEAD = [(1400, -1.5), (1900, 6), (2400, 17.5), (3000, 1.5), (3400, -3.5), (4600, -6), (5400, -4.5),
                 (6300, -18), (7700, -23), (10000, 1.5), (16000, -20)]
HISS_EQ_BESIDE = [(1400, -17), (1900, 0), (2300, -1), (2650, 2), (3030, 0), (3400, 2), (4000, 4),
                  (4550, 3.5), (5500, -0.5), (6600, -7.5), (8500, -6), (11000, -15), (16000, -28)]


def wheel_hiss():
    """The wheel discs hiss, changing colour as they come round to the side."""
    colour = swing(HISS_EQ_AHEAD, HISS_EQ_BESIDE) + wheel_colour() + 2 * eddies(rate=10, width_hz=120)
    hiss = noise(colour, *stereo_image(), band=(2800, 6000))
    gain = through_air(alongside_db=-27.5, loss_db_per_m=0.14, earshot_m=125)
    return hiss * gain * undb(bogie_surges("hiss") + 0.5 * wander(45))


# tone of the rumble: freq_hz, gain_db
RUMBLE_EQ = [(20, -29.5), (42, -13), (62, -1), (90, 2), (112, 3.5), (140, -6), (175, 3.5), (215, 1),
             (260, -.5), (310, 0), (385, -4), (440, -11), (520, -6), (900, -52)]
# heaves and dips of its low end: middle_s, length_s, boost_db
BASS_SWELLS = [(7.86, .2, 2.5), (8.13, .12, -7), (8.53, .4, -5), (9.22, .14, 1.5), (9.39, .1, 3)]


def car_rumble(in_open):
    """The car bodies rumble: a hollow note near 300 Hz from far down the line, a boom up close."""
    hollow = shape([(80, -5.5), (150, -15), (230, -7), (305, 5.5), (420, 1)]) * (1 - in_open)
    beside = in_open * (0.68 + 0.24 * closeness())  # grows as the train comes round to the side
    boom = resonances([(91.5, 25, 2.2), (180, 26, 3.2)]) * beside
    heave = swells(BASS_SWELLS, FRAME_S) * shape([(120, 1), (165, 0)])
    colour = shape(RUMBLE_EQ) + hollow + boom + heave + 3 * eddies(rate=7.1, width_hz=45.8)
    rumble = noise(colour, *stereo_image(), band=(140, 420))
    gain = through_air(alongside_db=-27.3, loss_db_per_m=0.083, earshot_m=104)
    return rumble * gain * undb(bogie_surges("rumble") + 0.8 * wander(14))


# tone of the roar: freq_hz, gain_db
ROAR_EQ = [(300, -25), (450, -9.5), (570, -.5), (680, -1.5), (800, -2.5), (1000, -3.5), (1130, -4),
           (1280, -1.5), (1700, .5), (2100, -20.5), (3000, -74)]
# track resonances that colour it from far off: centre_hz, width_hz, gain_db
TRACK_MODES = [(640, 110, 9.5), (1017, 230, 17.5), (1210, 120, -4)]


def rolling_roar(in_open):
    """Rough treads roar on the rail, coloured by the track from afar and by the wheels up close."""
    tilt = swing(ahead=[(450, -1.5), (700, 0.5), (1000, 1.5), (1500, -1.5)],
                 beside=[(450, -6.5), (700, 2), (1600, 2), (2100, 4)])
    track = resonances(TRACK_MODES) * (1 - in_open)
    colour = shape(ROAR_EQ) + tilt + wheel_colour() + track + 2 * eddies(rate=8, width_hz=51.1)
    roar = noise(colour, *stereo_image(), band=(520, 1200), apart_hz=1360)
    gain = through_air(alongside_db=-22.5, loss_db_per_m=0.108, earshot_m=162)
    return roar * gain * undb(bogie_surges("roar") + 0.54 * wander(14))


def scene():
    """The mix from the platform: background, rails, then the train itself."""
    remote = np.clip((ahead_m(FRAME_S) - 98) / 370, 0, 1)  # 1 far up the line, 0 within 98 m
    in_open = within(OPEN_M, FRAME_S)
    beds = faint_hiss() + drone() + murmur() + rush() + mutter()
    spots = thuds() + bird() + pings() + twangs()
    rails = rail_ring(remote) + rail_sizzle(remote)
    train = wheel_knock() + locomotive() + wheel_hiss() + car_rumble(in_open) + rolling_roar(in_open)
    return beds + spots + rails + train


def record(dry, low_hz=47, top_hz=15800, ceiling=.95):
    """The phone thins the deepest bass, rounds the loudest peaks and cuts the top."""
    thin = signal.sosfilt(signal.butter(3, low_hz, "high", fs=SR, output="sos"), dry)
    rounded = thin / (1 + (thin / ceiling) ** 6) ** (1 / 6)
    return signal.sosfilt(signal.ellip(12, .1, 80, top_hz, fs=SR, output="sos"), rounded)


dry = scene()
out = record(dry)
put_to_file(out)
```